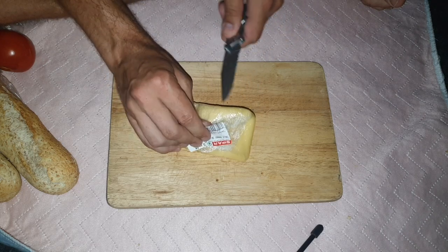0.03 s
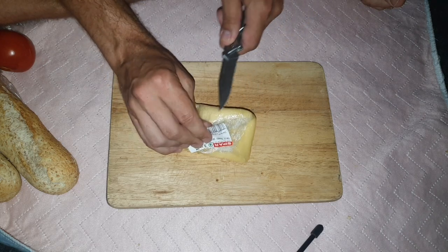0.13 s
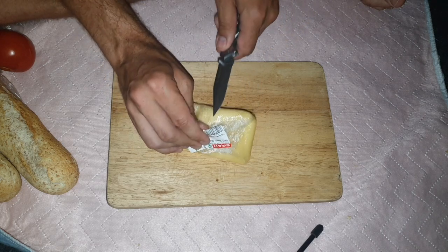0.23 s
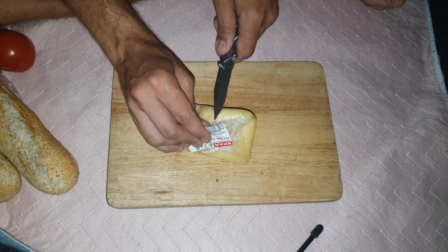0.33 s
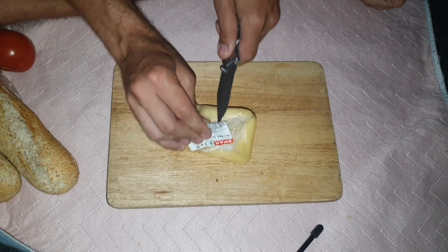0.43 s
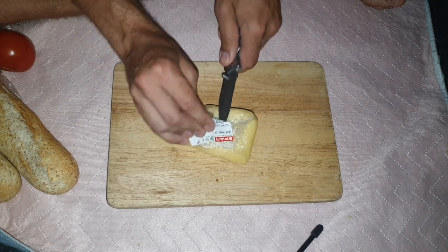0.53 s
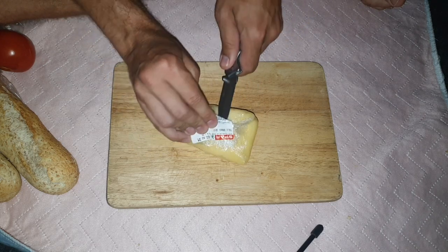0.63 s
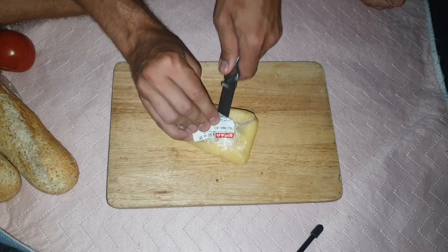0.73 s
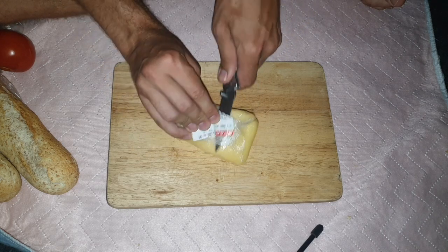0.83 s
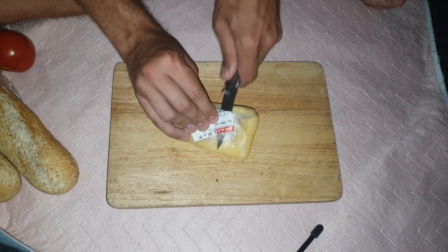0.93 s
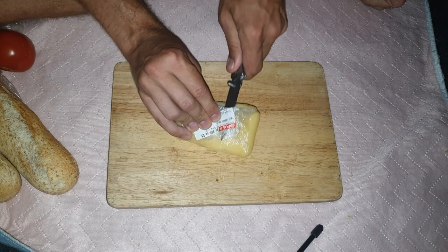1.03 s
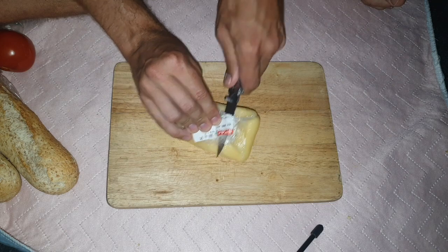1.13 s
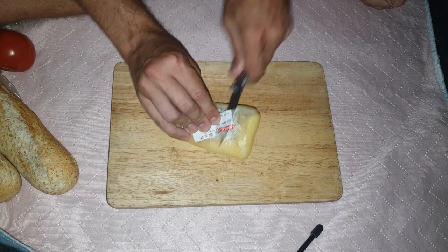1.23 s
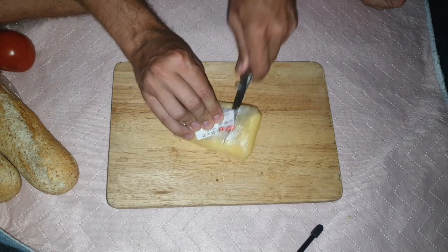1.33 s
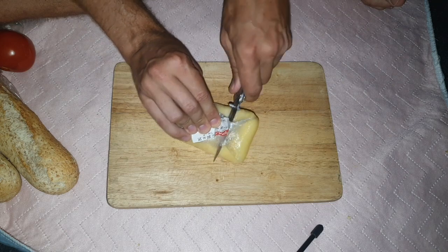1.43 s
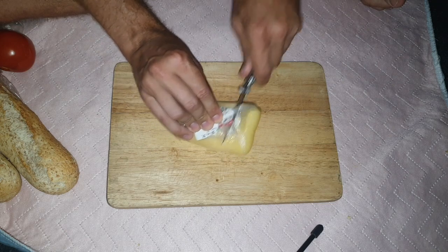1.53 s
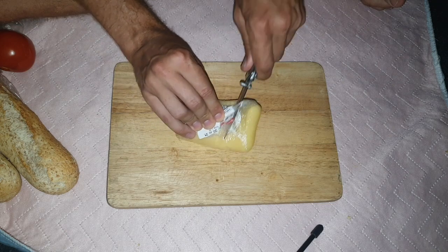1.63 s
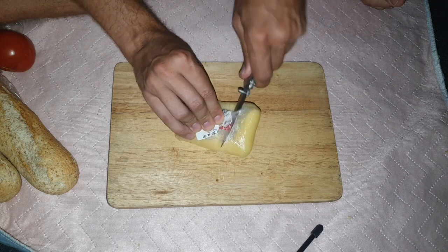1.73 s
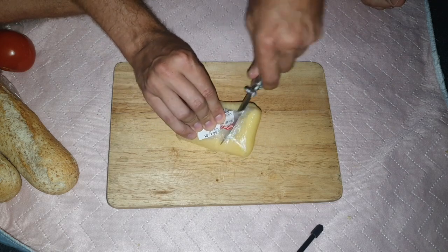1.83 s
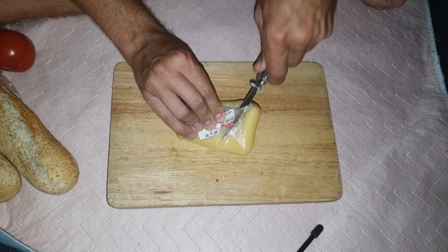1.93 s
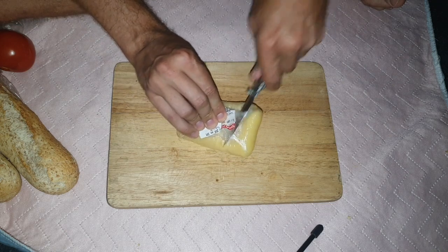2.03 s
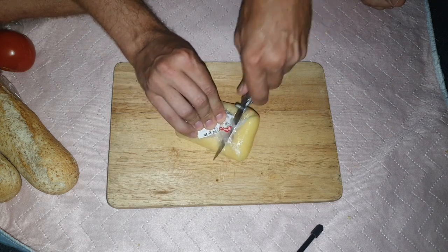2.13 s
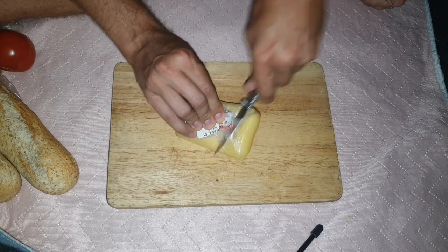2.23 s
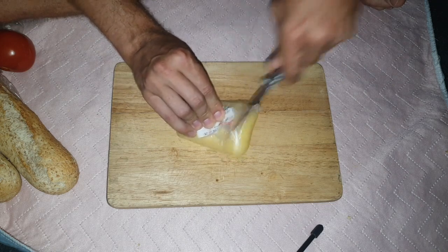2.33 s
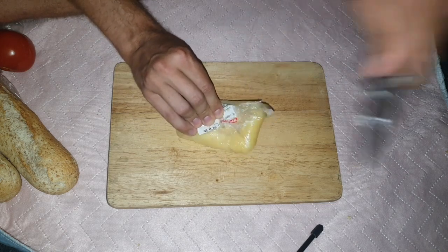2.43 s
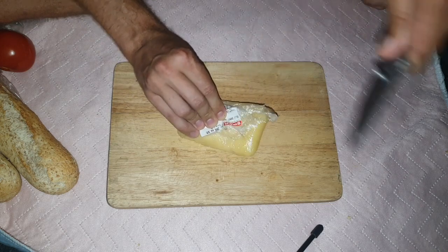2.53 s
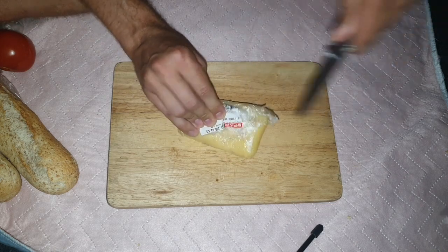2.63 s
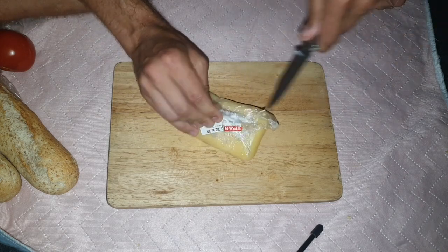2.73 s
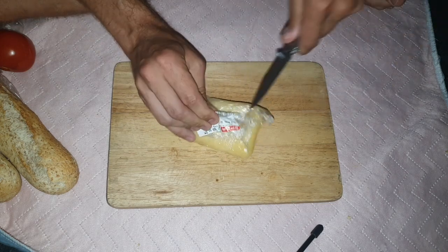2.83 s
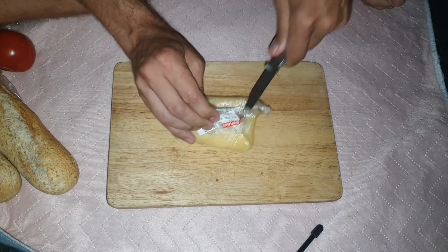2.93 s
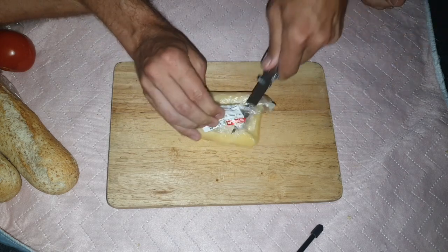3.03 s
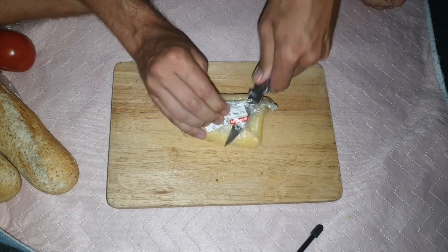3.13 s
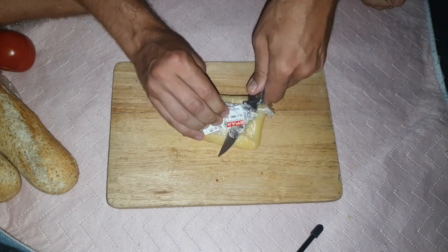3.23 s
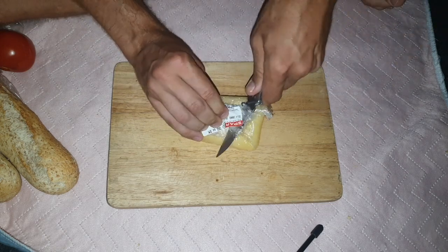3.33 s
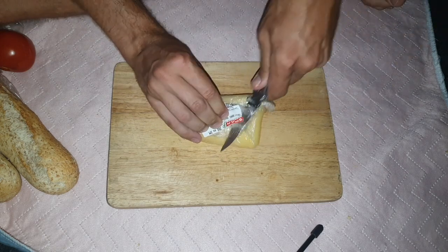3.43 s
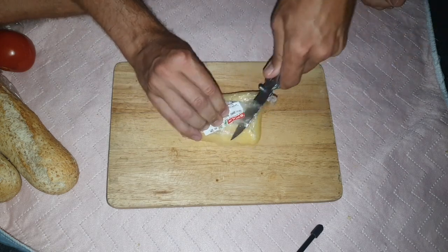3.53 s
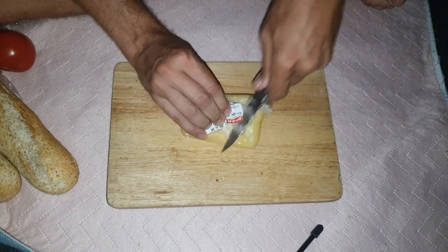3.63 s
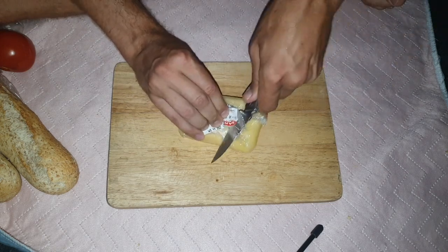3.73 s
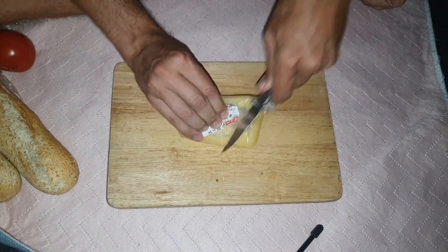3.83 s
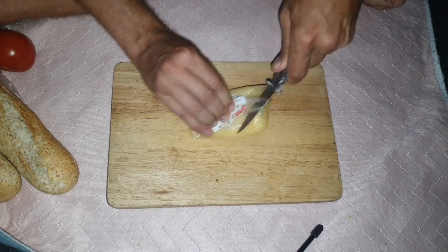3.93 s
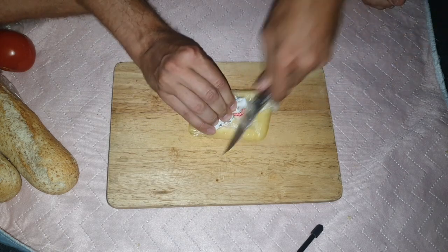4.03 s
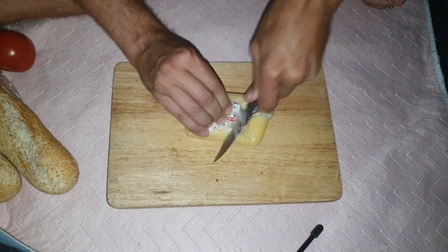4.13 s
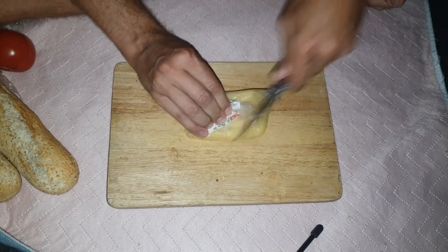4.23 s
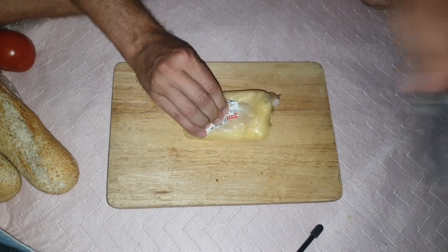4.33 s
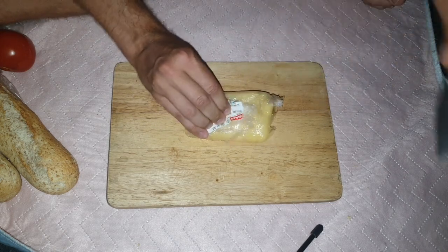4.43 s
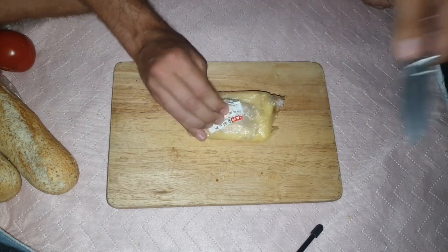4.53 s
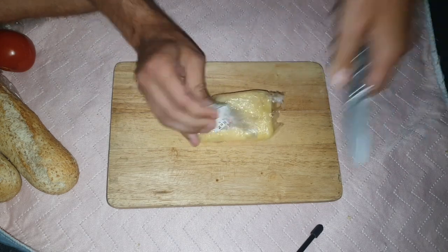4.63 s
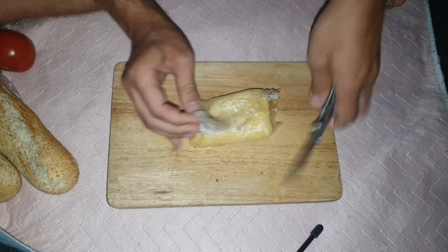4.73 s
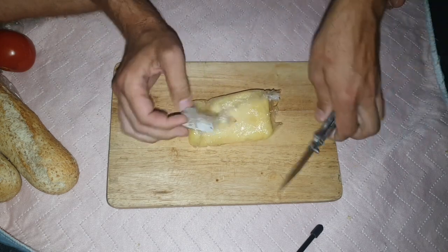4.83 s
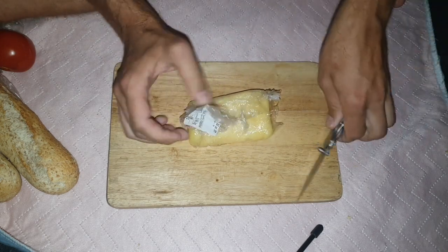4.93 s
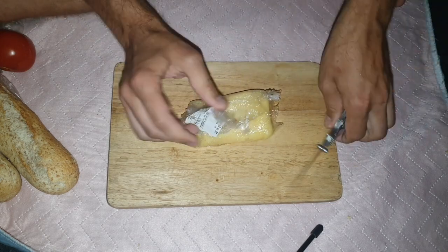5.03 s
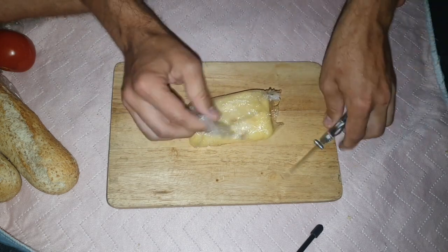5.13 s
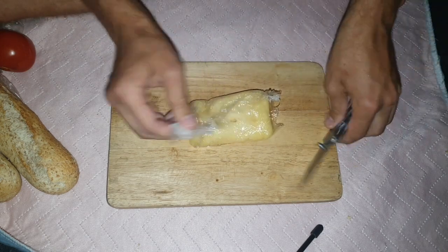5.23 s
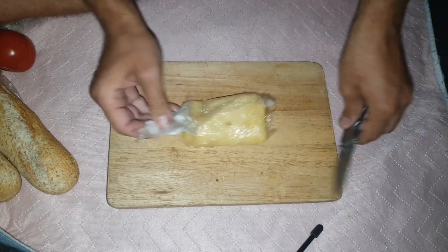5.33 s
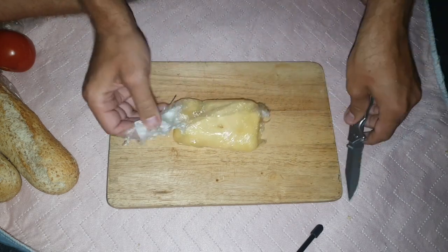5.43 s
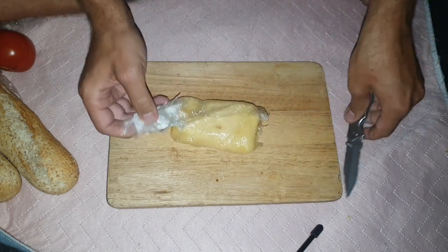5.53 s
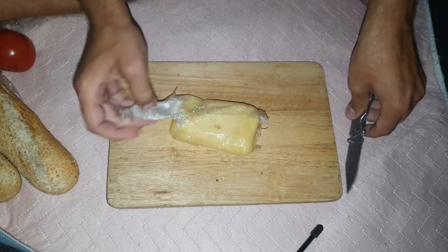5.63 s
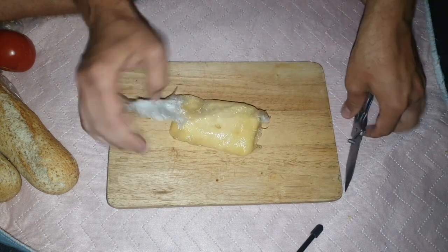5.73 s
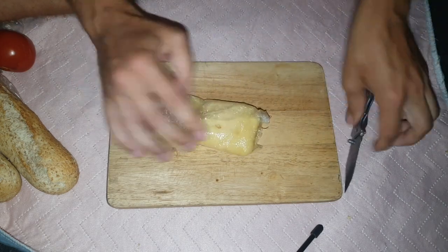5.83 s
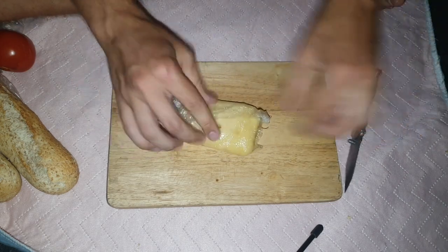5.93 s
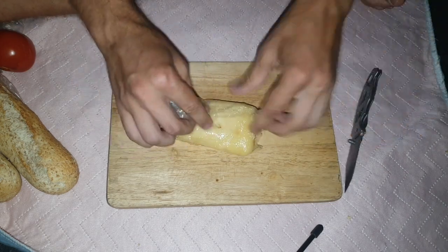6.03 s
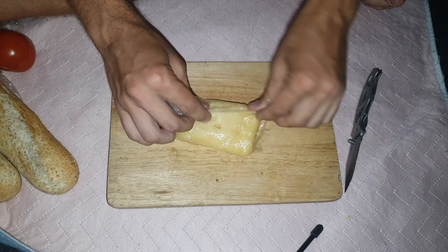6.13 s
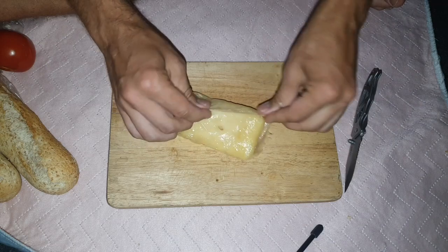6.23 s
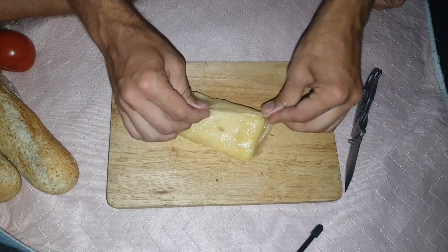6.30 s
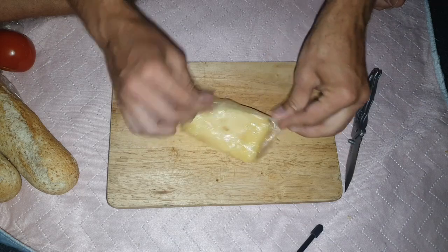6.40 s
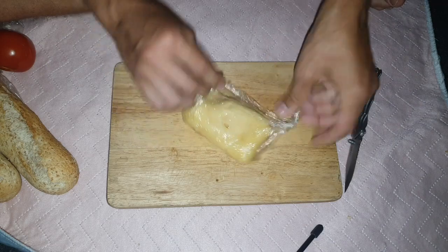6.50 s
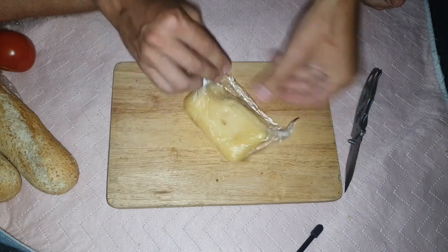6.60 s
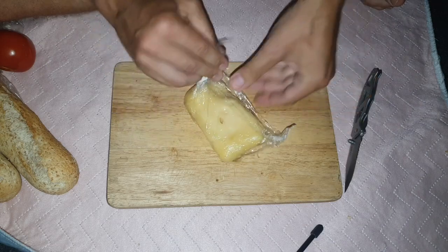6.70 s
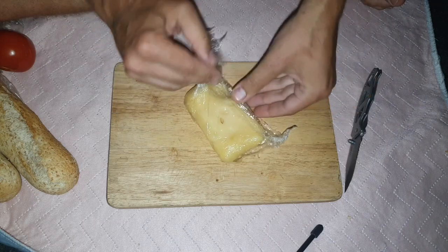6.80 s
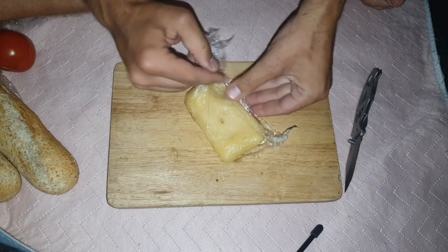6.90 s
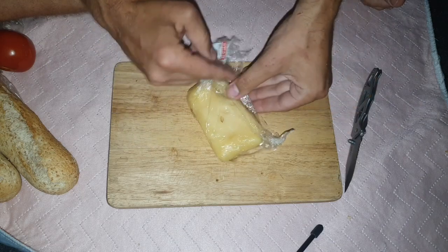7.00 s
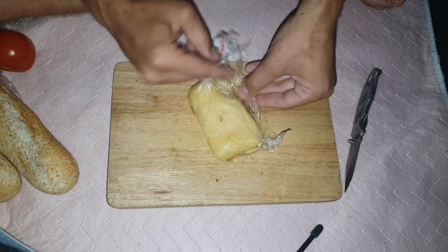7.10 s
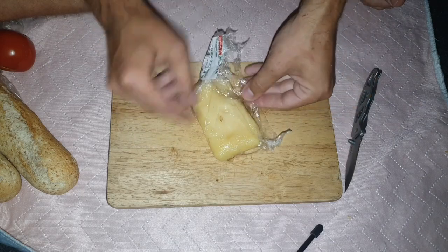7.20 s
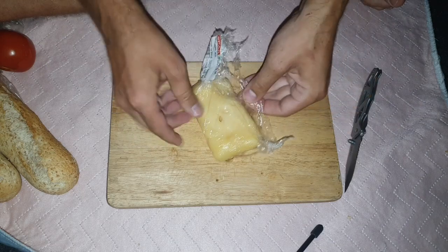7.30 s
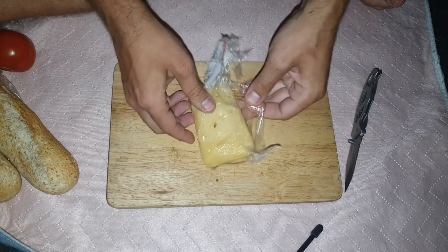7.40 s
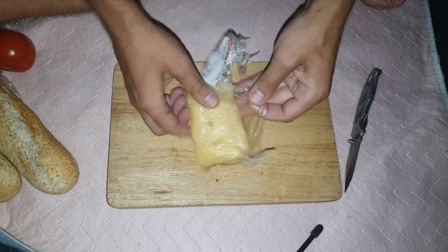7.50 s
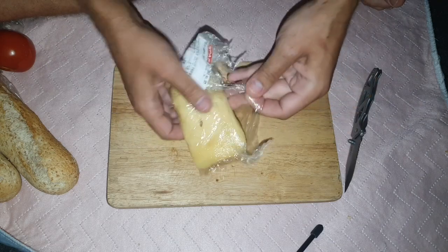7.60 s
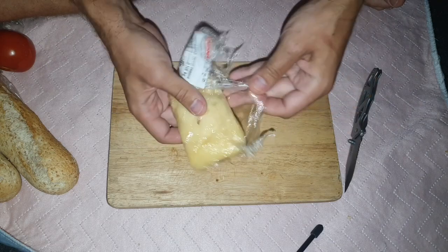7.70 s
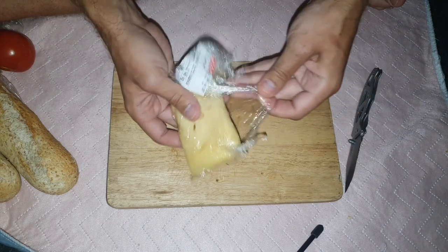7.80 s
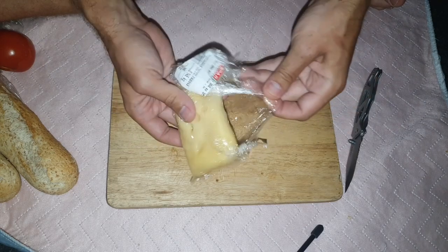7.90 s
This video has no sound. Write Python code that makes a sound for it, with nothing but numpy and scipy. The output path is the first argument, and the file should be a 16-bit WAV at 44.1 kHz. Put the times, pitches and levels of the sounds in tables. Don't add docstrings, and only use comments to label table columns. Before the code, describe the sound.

Plastic film crackles in fine clicks and sharp snaps as a knife slits it, then wooden knocks and finger crinkling over low traffic rumble.

```python
import sys
import numpy as np
from scipy import signal
from scipy.fft import rfft, irfft, next_fast_len
from scipy.io import wavfile
from scipy.ndimage import uniform_filter1d

SR = 44100
rng = np.random.default_rng(int(sys.argv[2]) if len(sys.argv) > 2 else 0)


def to_wav(sig):
    pcm = np.clip(np.atleast_2d(sig), -1, 1) * 32767
    pcm = np.round(pcm).astype(np.int16)
    wavfile.write(sys.argv[1], SR, pcm.T)


def rack_gain(trim_db):
    fader = np.asarray(trim_db, float)
    return 10 ** (fader / 20)


N = 350947
DELAY_S = 0.001236

# time in seconds, level in dB.
TRAFFIC_ROAR = [
    (0.0, -56.5),
    (1.7, -58.5),
    (2.8, -60.5),
    (4.2, -60),
    (5.8, -61.5),
    (6.2, -57),
    (6.7, -58.5),
    (7.05, -62),
    (7.4, -59),
    (7.95, -62.5),
]
# time in seconds, lift above the steady boom in dB.
WHEEL_PASSES = [
    (0.0, 5.5),
    (1.02, 5.5),
    (1.72, 1.5),
    (2.75, 3.5),
    (3.6, 3),
    (5.12, 7.5),
    (5.7, 1),
    (6.3, -0.5),
    (6.91, 5.5),
]
# frequency in Hz, level in dB per Hz.
CABIN_COLOUR = [(12, -30), (20, -4.5), (65, 6.5), (115, -9), (160, -5), (277, -18), (357, -24.5),
                (923, -21.5), (1120, -26.5), (1760, -19.5), (2320, -99.5), (3440, -23.5), (4180, -80),
                (6360, -52), (7310, -70.5), (8410, -38), (16000, -108)]
# frequency in Hz, share from 0 to 1.
LEFT_RIGHT_LIKENESS = [(60, 0.99), (125, 0.93), (300, 0.84), (600, 0.37), (2000, 0), (8000, .05)]
# time in seconds, peak in dB, pitch in Hz, 60 dB decay in s.
CABIN_JOLTS = [(2.276, -42.5, 64, 0.42), (2.323, -24.5, 62, 0.15), (2.399, -40, 59.6, 0.34),
               (4.1782, -36, 64.5, 0.14), (4.1946, -27, 62.2, 0.27), (5.08, -34, 65.6, 0.26),
               (5.13, -45, 58.4, 0.29), (5.281, -43.5, 63.7, 0.67), (7.25, -34, 63.5, 0.18),
               (7.301, -40.5, 63.5, 0.17), (0.44, -43.5, 55.2, 0.22), (0.801, -46, 55.4, 0.3),
               (7.489, -47.5, 59, 0.35), (7.911, -55, 54, .4)]

# time in seconds, peak in dB, then the level of mode groups 2, 3 and 4 in dB.
KNOCKS = [
    (4.755, -42, 9.5, 0, -5),
    (4.9255, -32, 0.5, 1, -4),
    (4.938, -39.5, 7, -2, -13),
    (5.078, -18, -28, -9.5, -11.5),
    (5.095, -26, -5, -10, -20),
    (5.28, -21.5, -1, -13, -5.5),
    (5.302, -33, -1, -11, -7),
    (5.313, -36, 6, -9, -0.5),
    (7.229, -48.5, 0, -4, -13),
    (7.245, -40.5, -3, -14, -8),
]
# pitch in Hz, level in dB, 60 dB decay in seconds.
BOARD_MODES = [
    [(272, -11.5, 0.18), (427, 8, 0.1), (476, 1.5, 0.061)],
    [(536, -3, 0.065), (606, -8, 0.057), (646, -4, 0.078), (724, -1, .05), (792, 4, 0.043)],
    [(850, 14, 0.027), (960, 3, 0.022), (998, 6.5, 0.049), (1194, -2.5, 0.034), (1194, 2.5, 0.027),
     (1377, 5, 0.043), (1550, -6, 0.023)],
    [(1580, -18, 0.016), (1705, 1.5, 0.059), (1815, 2, 0.047), (1960, -4, .03), (2120, -6.5, 0.028),
     (2370, -14, 0.031)],
    [(2860, 11, 0.0037), (2780, -6, 0.073), (3130, 14.5, 0.015), (3300, -14, 0.031), (3510, -10, 0.045),
     (3700, -6, 0.037), (4150, -15, .02), (4470, -28, .04), (5160, -24, .015)],
]
# time in seconds, level in dB.
KNIFE_DRAG = [
    (5.195, -57),
    (5.209, -40),
    (5.24, -32.5),
    (5.25, -62),
]
# time in seconds, body in dB, crack in dB.
THUDS = [
    (4.754, -33, -57),
    (4.926, -28, -43),
    (5.079, -30, -37),
    (5.278, -33, -42),
    (7.238, -43, -60),
    (5.305, -29, -44),
]
# time in seconds, level in dB, pitch in Hz, 60 dB decay in seconds.
HANDLE_RINGS = [
    (4.755, -34, 1720, 0.083),
    (4.755, -23, 833, 0.039),
    (4.9255, -29, 3440, .06),
    (4.9255, -34, 2350, 0.033),
    (4.926, -36, 4150, 0.043),
    (5.077, -35, 2450, 0.035),
    (5.079, -38, 3820, .04),
    (5.28, -32, 1750, 0.11),
    (5.28, -31, 2500, .03),
    (5.31, -31, 658, 0.13),
]
# pitch in Hz, level in dB, 60 dB decay in seconds.
SOFT_SEAT = [(138, 4.5, 0.033), (280, -1.5, 0.041)]
# frequency in Hz, left minus right in dB.
BOARD_EAR_GAP = [(250, 1.5), (500, 0.5), (1000, 2.5), (2500, 7.5), (5000, -2)]

# frequency in Hz, level in dB per Hz.
FILM_COLOUR = [(290, -22), (500, 1.5), (640, -15.5), (1000, 0.5), (1570, -7), (2100, 3.5), (2290, 0),
               (2540, 4), (3540, 5.5), (6420, -13.5), (7530, -20), (8700, -15.5), (11300, -16.5),
               (16000, -25)]
# frequency in Hz, left minus right in dB.
FILM_EAR_GAP = [(500, 0.5), (2500, 4), (4000, 2.5), (6300, -17), (7300, -6.5), (8500, 6), (11000, -3),
                (15000, -10)]
# time in seconds, peak in dB, sheen (treble) in dB, body in dB,
# ring of the taut patch in Hz.
SNAPS = [(0.4276, -39, -14, -16, 3020), (0.4355, -25.5, -17, -24, 2330), (0.4417, -40, -30, -17, 2640),
         (0.458, -32, -11, -13, 3200), (1.4937, -29, -4, -20, 3880), (2.247, -33, -5, -35, 3070),
         (2.2729, -32, -19, -1, 4470), (2.2625, -34, -20, -25, 2410), (2.2809, -29, -12, -5, 4300),
         (2.3076, -13, -2, -46, 2150), (2.3153, -7.5, -16, -28.5, 3300), (3.0343, -35.5, -23, -12, 2460),
         (3.0887, -37, -7, -16, 2500), (3.291, -40, -18, -25, 2500), (3.4508, -25, -14, -20.5, 3450),
         (3.5896, -28, -25, -35, 2500), (3.6355, -14.5, -10, -32, 2430), (3.6379, -19.5, -20, -36, 3130),
         (3.7185, -22, -13, -35, 3330), (3.8745, -28, -1, -44, 2220), (4.1725, -22, -3, -15, 4430),
         (4.1857, -10, -4, -20, 4360), (4.198, -21, -2, -28, 5860), (4.2011, -20, -3, -8, 2860),
         (4.206, -31, 2, -15, 4570), (4.2125, -26.5, -13, -6, 3520), (4.4513, -27.5, -30, -22, 3170),
         (4.4993, -27.5, -37, -19.5, 3370), (5.1345, -27.5, -16, -16, 3130),
         (7.699, -36.5, -22, -4.5, 1820)]
# time in seconds, peak in dB, sheen in dB.
BLADE_TICKS = [(0.644, -35.5, -14), (0.706, -38, -30), (0.7342, -30, -23), (0.5022, -42, -23),
               (0.7856, -29, -6), (0.869, -34, -14), (0.917, -35, -30), (1.003, -37, -35),
               (1.045, -32.5, -6), (1.083, -32, -20), (1.1775, -30, -18), (1.2987, -37, -5),
               (1.33, -37, -19), (1.364, -34.5, -28), (1.611, -35, -5), (1.6717, -39.5, -20),
               (2.055, -39, -12), (2.187, -35, -10), (2.537, -36.5, -6), (2.653, -33, -49),
               (3.3615, -34, -5), (3.434, -32, -7), (3.747, -30, -19), (4.0989, -28.5, -31.5),
               (4.347, -57, -10), (4.419, -32, -22), (0.571, -45, -8), (0.6208, -49, -22),
               (0.7285, -35, -20), (0.983, -41, -26), (1.024, -44, -18), (1.164, -45, -21),
               (1.275, -37.5, -12), (1.3148, -33.5, -8), (1.4426, -39, -1), (1.59, -48, -12),
               (2.222, -40, -15), (2.3585, -35, -17), (2.381, -57, -19), (3.487, -56, -15),
               (3.687, -53, -10), (3.7048, -53, -15), (3.8341, -38.5, -15), (3.907, -41, -2),
               (3.985, -39, -7), (4.3028, -39.5, -14), (4.4048, -39, -3), (4.6338, -41, -18)]
# time in seconds, peak in dB, sheen in dB.
FINGER_TICKS = [(5.212, -39, -23), (5.539, -44, -12), (5.6374, -38, -13), (5.688, -37.5, -7.5),
                (6.1012, -36.5, -24), (6.372, -37.5, -14), (6.5026, -34.5, -4), (6.6655, -44, -29),
                (7.175, -42.5, -6), (7.2518, -38, -14), (7.279, -32.5, -4), (7.654, -38, -20),
                (7.4363, -58, -17), (7.6835, -44, -18), (7.7184, -32, -5), (7.9303, -33, -7),
                (6.0154, -46, -13), (6.2487, -45, -12), (6.2894, -42.5, -10), (6.32, -44, -14),
                (6.4616, -41, -10), (6.9035, -43, -2), (7.214, -44, -15), (7.337, -38, -8),
                (7.362, -44, -15), (7.4638, -39, -3), (7.523, -45, -17), (7.763, -41, -18),
                (7.91, -48, -12), (6.565, -50, -2), (6.604, -54, 0), (6.73, -47, -3), (6.8856, -53, 0),
                (6.182, -46, -6)]
# start in seconds, hold in seconds, level in dB, sheen relative to that level in dB.
KNIFE_CUTS = [(0.19, .01, -71.5, -10), (0.305, 0.072, -68, -28), (0.442, 0.11, -72, -1),
              (0.647, 0.28, -60.5, -6), (1.043, 0.17, -61, -1), (1.297, 0.2, -61, -1.5),
              (1.591, 0.081, -64, -4.5), (1.784, .08, -64, -5.5), (1.981, 0.079, -60, -2),
              (2.261, 0.042, -45.5, -3), (2.428, 0.034, -65.5, 1), (2.547, 0.16, -59, -3.5),
              (2.777, 0.036, -71.5, 4.5), (2.951, .17, -62, -4), (3.191, 0.01, -61.5, -0.5),
              (3.3, 0.081, -66, 1), (3.413, 0.23, -57.5, -0.5), (3.748, 0.079, -56, 1.5),
              (3.956, 0.082, -55, 0.5), (4.108, 0.07, -55.5, 2), (4.188, 0.0069, -47.5, -10),
              (4.345, .15, -59.5, 1), (4.584, 0.023, -62, 0.5), (4.69, 0.042, -69.5, -5)]
# start in seconds, hold in seconds, level in dB, sheen relative to that level in dB.
FINGER_PULLS = [(5.146, 0.12, -59, -2), (5.323, 0.047, -65.5, -2.5), (5.437, 0.14, -72, -2.5),
                (5.648, 0.019, -65, -7), (6.058, 0.064, -62, 2), (6.1, 0.055, -60.5, -3),
                (6.23, 0.016, -70.5, 4.5), (6.338, 0.084, -59.5, -1.5), (6.48, 0.015, -69, 0),
                (6.57, 0.16, -82.5, 5), (6.897, 0.012, -68, -2), (7.03, 0.043, -71.5, 1.5),
                (7.226, 0.11, -61, -1), (7.385, 0.026, -67, 3), (7.473, 0.078, -61, -0.5),
                (7.645, .16, -59, -1), (7.847, 0.06, -62, -3)]
# pitch in Hz, level in dB, 60 dB decay in seconds.
TAUT_PATCHES = [(2360, -46, 0.0016), (2970, -10.5, 0.032), (3460, 1, 0.0029), (3580, -12, 0.0026),
                (4520, 8.5, 0.0033)]
# start in seconds, hold in seconds, level in dB, pitch in Hz.
RINGING_FOLDS = [(0.44, .02, -49.5, 2600), (3.5, 0.021, -52, 2600), (3.62, .03, -49, 2300),
                 (4.05, 0.015, -43, 2100), (2.307, .005, -40, 2300), (0.7, 0.076, -55, 3100),
                 (0.875, 0.05, -51, 3400), (1.05, 0.063, -42.5, 3470), (1.16, 0.046, -72, 3300),
                 (1.293, 0.058, -49, 3450), (3.036, 0.057, -50, 2670), (3.307, 0.028, -50.5, 2930),
                 (0.785, 0.018, -48, 3500), (7.273, 0.028, -48, 3000), (7.43, .02, -58.5, 1500),
                 (7.483, 0.033, -60, 3700), (7.697, 0.012, -47.5, 1530), (2.28, 0.016, -37, 4800),
                 (7.5, 0.042, -62, 3000)]

SHEEN_HZ, BODY_HZ = 6380, 2330
CREASES_PER_S, SHEEN_CREASES_PER_S, FOLD_CREASES_PER_S = 1300, 4000, 350
RISE_DB_PER_S, FALL_DB_PER_S = 231, 262


def lookup(table, hz):
    f, v = np.transpose(table)
    return np.interp(np.log(np.maximum(hz, 1)), np.log(f), v)


def curve(table):
    s, level = np.transpose(table)
    return np.interp(np.arange(N) / SR, s, level)


def causal(gain_db, size=2048):
    cep = irfft(gain_db(np.fft.rfftfreq(size, 1 / SR)) * np.log(10) / 20)
    cep[1:size // 2] *= 2
    cep[size // 2 + 1:] = 0
    return irfft(np.exp(rfft(cep)))


def convolve(x, response):
    return signal.fftconvolve(np.atleast_2d(x), np.atleast_2d(response), axes=1)[:, :N]


def walk(rate):
    k = int(SR / rate)
    held = np.repeat(rng.standard_normal(N // k + 1), k)
    return 1.64 * uniform_filter1d(uniform_filter1d(held, k), k)[:N]


def spikes(s, size):
    return np.bincount(np.minimum((np.asarray(s) * SR).astype(int), N - 1), size, N)


def fade(x, t60):
    return signal.lfilter([1], [1, -np.exp(-np.log(1000) / (t60 * SR))], x)


def ring(x, hz, t60):
    pole = np.exp(2j * np.pi * hz / SR - np.log(1000) / (t60 * SR))
    return signal.lfilter([1], [1, -pole], x + 1e-18).imag


def band(x, edges_hz):
    return signal.lfilter(*signal.butter(1, edges_hz, "band", fs=SR), x)


def space(t60, wet_db, size=8192):
    t = np.arange(size) / SR
    tail = rng.standard_normal((2, size)) * rack_gain(-60 * t / t60) * np.clip(t / 0.0017 - 0.2, 0, 1)
    tail = tail - uniform_filter1d(tail, int(SR / 900), axis=1)
    out = rack_gain(wet_db) * tail / np.sqrt(np.sum(tail ** 2, axis=1, keepdims=True))
    out[:, 0] += 1
    return out / np.sqrt(1 + rack_gain(2 * wet_db))


def two_microphones(x, gap, dip_db=0):
    def colour_db(hz, half):
        return half * lookup(gap, hz) + dip_db * np.exp(-((hz - 7700) / 550) ** 2)
    ears = np.array([causal(lambda hz: colour_db(hz, half)) for half in (0.5, -0.5)])
    return convolve(x, ears)


def traffic():
    roar_db = curve(TRAFFIC_ROAR)
    t = np.arange(N) / SR
    boom_db = -53.5 + sum(db * np.exp(-((t - s) / 0.16) ** 2) for s, db in WHEEL_PASSES)
    size = next_fast_len(N)
    hz = np.fft.rfftfreq(size, 1 / SR)
    like = np.clip(lookup(LEFT_RIGHT_LIKENESS, hz), 0, 1)
    colour = rack_gain(lookup(CABIN_COLOUR, hz))
    mid = rfft(rng.standard_normal(size)) * colour * np.sqrt(1 + like)
    side = rfft(rng.standard_normal(size)) * colour * np.sqrt(1 - like)
    ranges = [(0, 88, boom_db + 7.5), (95.7, 255, -54.5),
              (254.8, 1500, roar_db + 0.16), (1604, SR, 0.5 * roar_db - 38.0)]
    out = 0
    for lo_hz, hi_hz, level_db in ranges:
        gate = (hz >= lo_hz) & (hz < hi_hz)
        m, d = irfft(mid * gate, size)[:N], irfft(side * gate, size)[:N]
        level = rack_gain(level_db + 1.03 * walk(5.1)) / np.std(m)
        out = out + level * np.array([m + d, m - d])
    return out


def jolts():
    shove = np.hanning(int(0.0083 * SR))
    rings = sum(ring(spikes([s], [rack_gain(db + 15.0)]), hz, t60) for s, db, hz, t60 in CABIN_JOLTS)
    return -signal.fftconvolve(rings, shove / shove.sum())[:N]


def knife_drag():
    t = np.arange(N) / SR
    judder = rack_gain(-26) * np.sin(2 * np.pi * 420 * t)
    touching = (t > KNIFE_DRAG[0][0]) * (t < KNIFE_DRAG[-1][0])
    rasp = (0.5 * rng.standard_normal(N) + judder) * rack_gain(curve(KNIFE_DRAG) - 25.5) * touching
    return rasp + spikes([5.134], [rack_gain(-39)])


def board_modes():
    s, peak_db, *groups_db = np.transpose(KNOCKS)
    highest_db = -8 + 0.47 * groups_db[-1]
    groups_db = [0 * s] + groups_db + [highest_db]
    trims_db, drags_db = [0.39, 0.13, 0.26, 2.0, 0.75], [1.0, -7, -11, -8, -13.0]
    drag = knife_drag()
    out = 0
    for modes, group_db, trim_db, drag_db in zip(BOARD_MODES, groups_db, trims_db, drags_db):
        for hz, db, t60 in modes:
            chance = rng.standard_normal((len(s), 2))
            spot = rack_gain(1.5 * chance[:, 0]) * np.sign(chance[:, 1])
            blow = spikes(s + DELAY_S, spot * rack_gain(peak_db + group_db + trim_db))
            rattle = rng.standard_normal(N) * fade(blow, t60=0.052) * rack_gain(-30)
            out = out + rack_gain(db) * ring(blow + rattle + drag * rack_gain(drag_db), hz, t60)
    return out


def thuds():
    s, body_db, crack_db = np.transpose(THUDS)
    s = s + DELAY_S
    noise = rng.standard_normal(N)
    crack = band(noise * fade(spikes(s, rack_gain(crack_db)), t60=0.053), [2000, 4470])
    push = band(spikes(s, rack_gain(body_db + 19.5)), [300, 1800])
    body = noise * fade(spikes(s, rack_gain(body_db)), t60=0.15)
    body = signal.lfilter(*signal.butter(1, 1170, fs=SR), body)
    seat = sum(ring(spikes(s, rack_gain(body_db + db)), hz, t60) for hz, db, t60 in SOFT_SEAT)
    return crack - push + body + seat


def handle():
    return sum(ring(spikes([s + DELAY_S], [rack_gain(db)]), hz, t60) for s, db, hz, t60 in HANDLE_RINGS)


def board():
    out = board_modes() + thuds() + handle()
    contact = np.exp(-0.5 * ((np.arange(-20, 21) / SR) / 0.00003) ** 2)
    out = np.convolve(out, contact / contact.sum(), "same")
    out = convolve(out, space(t60=0.027, wet_db=1.6))
    return two_microphones(out, BOARD_EAR_GAP, dip_db=-15)


def film_parts():
    def low(hz, edge):
        return -20 * np.log10(1 + (np.maximum(hz, 1) / edge) ** 4.27)

    def high(hz, edge):
        return low(edge ** 2 / np.maximum(hz, 1), edge)

    parts = [causal(lambda hz: lookup(FILM_COLOUR, hz) + low(hz, SHEEN_HZ) + high(hz, BODY_HZ)),
             causal(lambda hz: lookup(FILM_COLOUR, hz) + high(hz, SHEEN_HZ)),
             causal(lambda hz: lookup(FILM_COLOUR, hz) + low(hz, BODY_HZ))]
    return [p / np.sqrt(np.sum(p ** 2)) for p in parts]


def swarm(count=CREASES_PER_S):
    fires = rng.random(N) < count / SR
    sign = np.sign(rng.standard_normal(N))
    size_db = np.minimum(3.0 * rng.exponential(size=N), 13)
    x = fires * sign * rack_gain(size_db + 2.2 * walk(50))
    return x / np.sqrt(np.mean(x ** 2))


def strokes(rows, tops_db, rests_db):
    start, hold = np.transpose(rows)[:2]
    t = np.arange(0, N, 64) / SR
    rise_db = RISE_DB_PER_S * (start - t[:, None])
    fall_db = FALL_DB_PER_S * (t[:, None] - start - hold)
    shape = rack_gain(-np.maximum(0, np.maximum(rise_db, fall_db)))
    tide_db = np.interp(t, *np.transpose(TRAFFIC_ROAR)) + 60
    out = []
    for top_db, rest_db in zip(tops_db, rests_db):
        power = shape ** 2 @ rack_gain(2 * top_db) + rack_gain(2 * (rest_db + tide_db))
        out.append(np.interp(np.arange(N) / SR, t, 10 * np.log10(power)))
    return out


def effort():
    moves = KNIFE_CUTS + FINGER_PULLS
    db, sheen_db = np.transpose(moves)[2:]
    body_db = 0.64 * db + np.repeat([-22.5, -19], [len(KNIFE_CUTS), len(FINGER_PULLS)])
    return strokes(moves, [db, db + sheen_db, body_db], [-78.5, -87.5, -68])


def snap_rows():
    rows = [row + (-33, 3450) for row in BLADE_TICKS]
    rows = rows + [row + (-17, 3300) for row in FINGER_TICKS]
    s, peak_db, sheen_db, body_db, patch_hz = np.transpose(SNAPS + rows)
    small = np.arange(len(s)) >= len(SNAPS)
    scatter = 1 + 0.081 * rng.standard_normal(len(s)) * small
    soft_db = 0.3 * small
    rush_db = -42.5 + 0.0094 * peak_db - 2 * soft_db
    return s + DELAY_S, peak_db + soft_db, sheen_db, body_db, patch_hz * scatter, rush_db


def folds():
    creases = swarm(count=FOLD_CREASES_PER_S)
    out = 0
    for start, hold, db, hz in RINGING_FOLDS:
        level_db = strokes([(start, hold)], [np.array([db - 12])], [-120])[0]
        out = out + ring(creases * rack_gain(level_db), hz, t60=0.0084)
    return out


def film():
    s, peak_db, sheen_db, body_db, patch_hz, rush_db = snap_rows()
    main_db, sheen_swarm_db, body_swarm_db = effort()
    main, sheen, body = film_parts()
    # colour, swarm dB, snap size dB, click dB, creases per second
    layers = [(main, main_db + 4.0, 11, 4.5, CREASES_PER_S),
              (sheen, sheen_swarm_db + 4.0, sheen_db + 23.0, -10, SHEEN_CREASES_PER_S),
              (body, body_swarm_db - 3, body_db + 19.0, 3, CREASES_PER_S)]
    hiss, swarms, efforts = rng.standard_normal((2, N)), 0, []
    snaps = sum(ring(spikes([t], [rack_gain(db + 1.5)]), hz, t60=0.007) for t, db, hz in zip(s, peak_db, patch_hz))
    for part, swarm_db, size_db, click_db, count in layers:
        rush = fade(spikes(s, rack_gain(peak_db + size_db + rush_db)), t60=0.061)
        efforts.append(rack_gain(swarm_db) + rush)
        near = swarm(count) * efforts[-1]
        scattered = hiss * np.sqrt(fade(near ** 2, t60=0.049)) * rack_gain(-23.0)
        swarms = swarms + convolve(near + scattered, part)
        snaps = snaps + signal.fftconvolve(spikes(s, rack_gain(peak_db + size_db + click_db)), part)[:N]
    patches = sum(rack_gain(db - 19.0) * ring(swarm() * efforts[0], hz, t60) for hz, db, t60 in TAUT_PATCHES)
    out = swarms + convolve(snaps + patches + folds(), space(t60=0.085, wet_db=-1.0))
    return two_microphones(out, FILM_EAR_GAP)


def scene():
    return traffic() + jolts() + board() + film()


def low_pass(x):
    return signal.sosfilt(signal.butter(12, 16400, fs=SR, output="sos"), x)


def record(dry):
    x = signal.sosfilt(signal.butter(2, 40, "high", fs=SR, output="sos"), dry)
    x = signal.sosfilt(signal.ellip(10, 0.2, 80, 15850, fs=SR, output="sos"), x)
    return low_pass(x)


dry = scene()
out = record(dry)
to_wav(out)
```